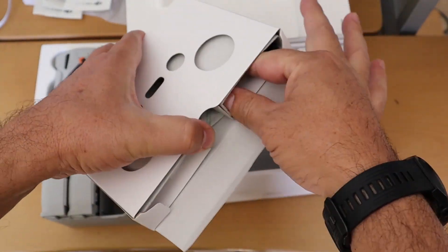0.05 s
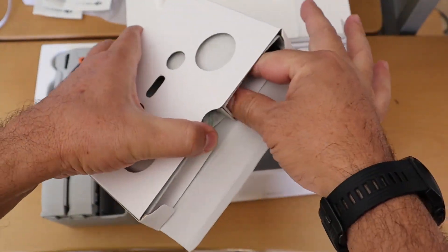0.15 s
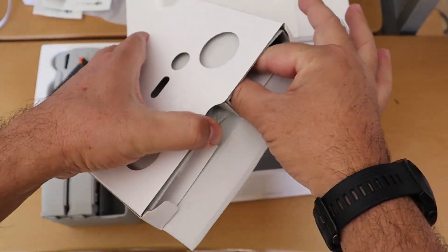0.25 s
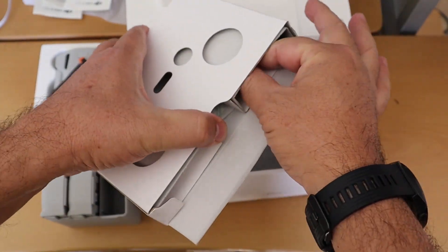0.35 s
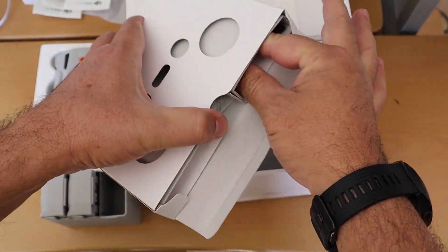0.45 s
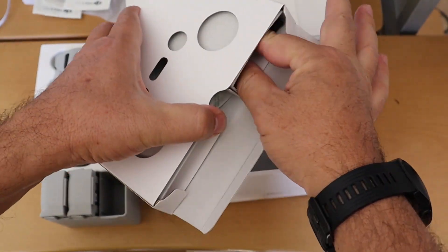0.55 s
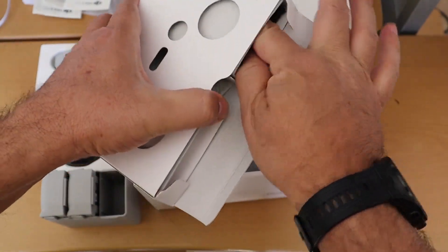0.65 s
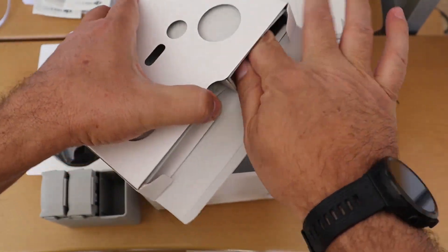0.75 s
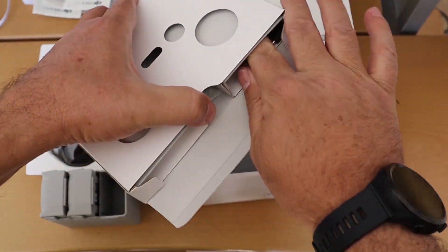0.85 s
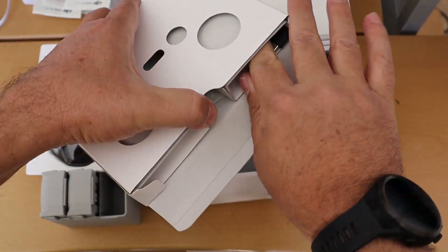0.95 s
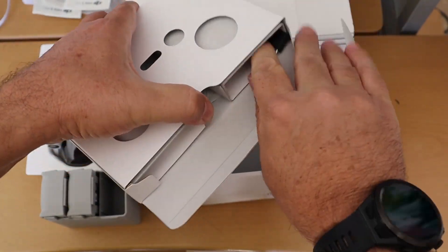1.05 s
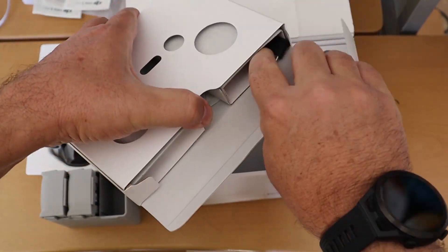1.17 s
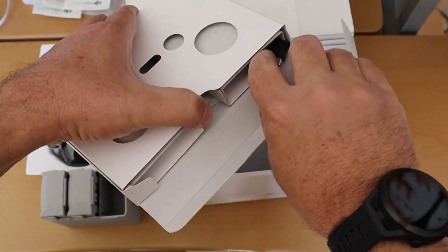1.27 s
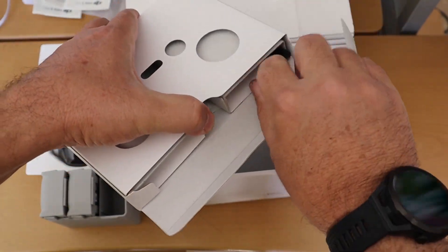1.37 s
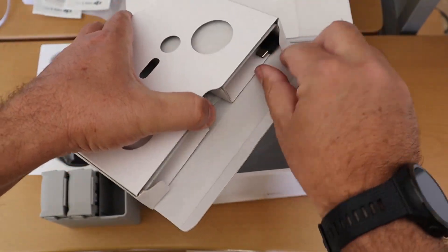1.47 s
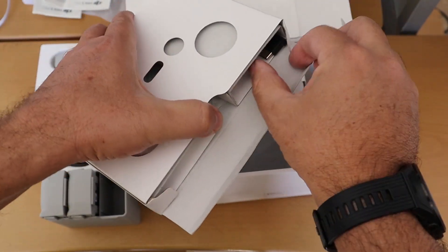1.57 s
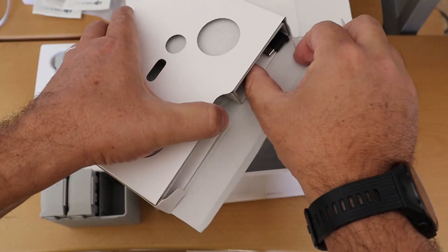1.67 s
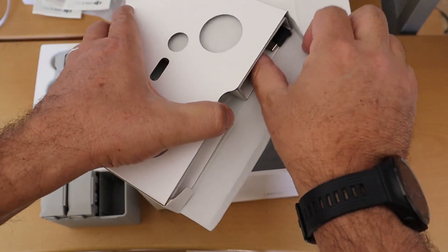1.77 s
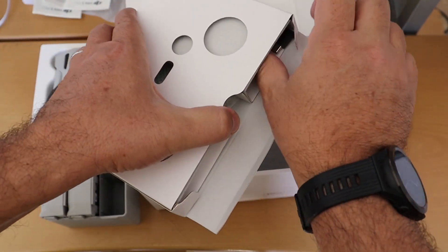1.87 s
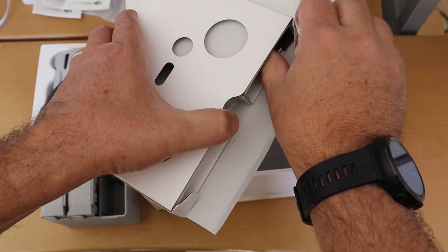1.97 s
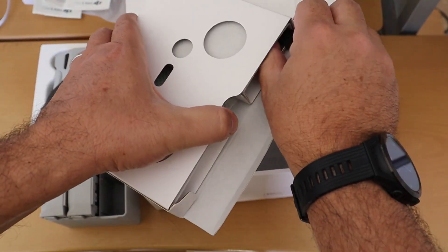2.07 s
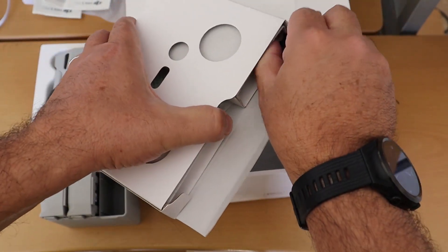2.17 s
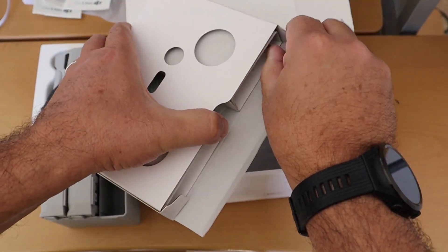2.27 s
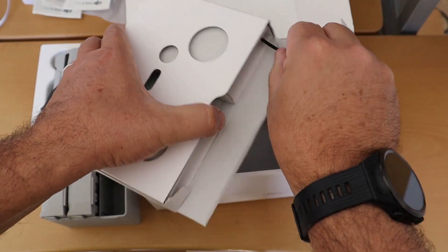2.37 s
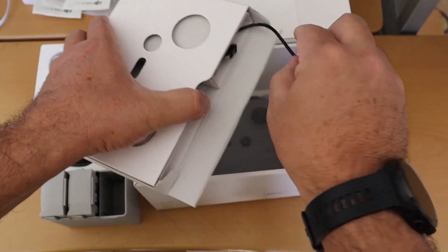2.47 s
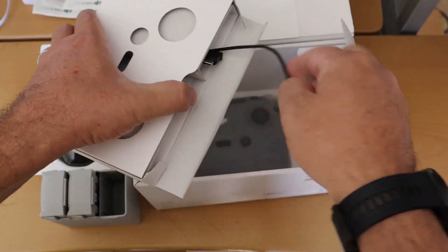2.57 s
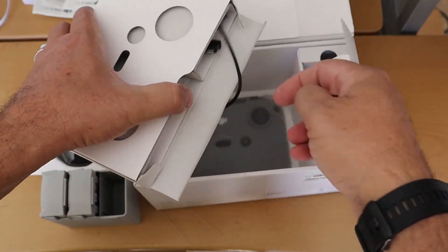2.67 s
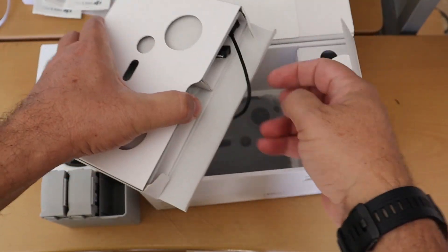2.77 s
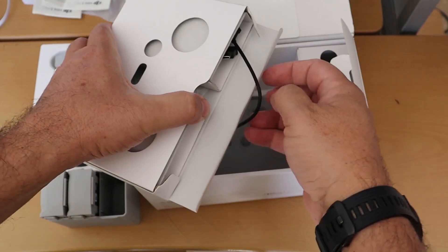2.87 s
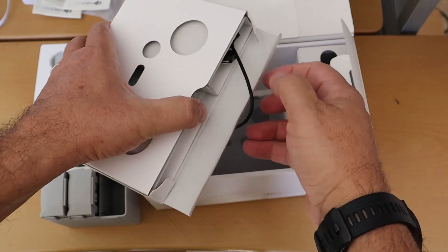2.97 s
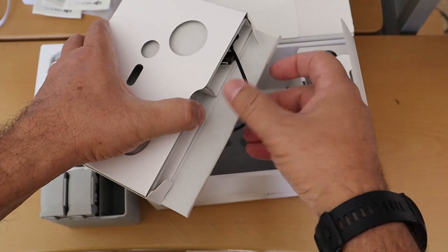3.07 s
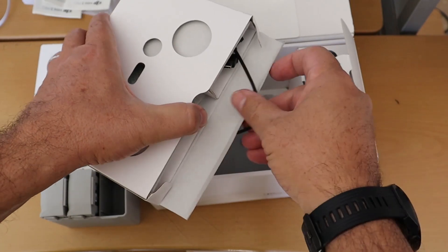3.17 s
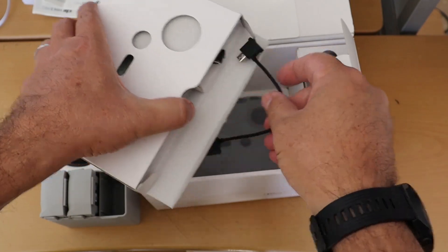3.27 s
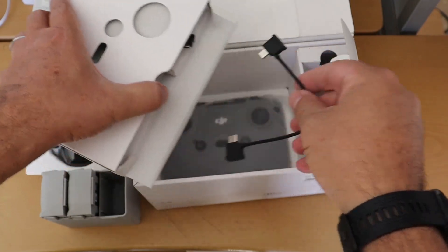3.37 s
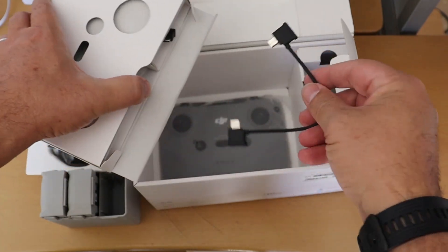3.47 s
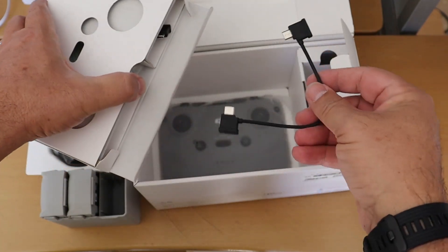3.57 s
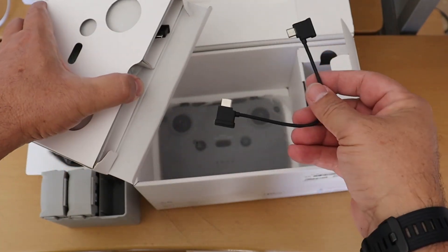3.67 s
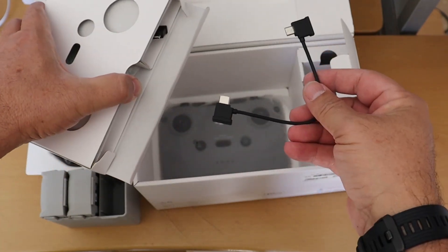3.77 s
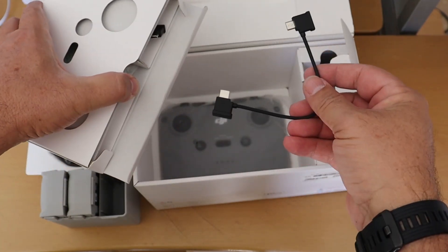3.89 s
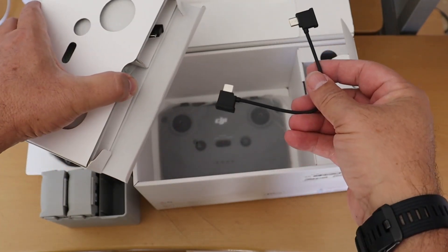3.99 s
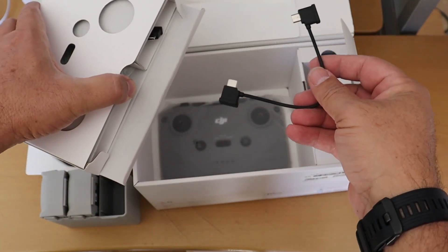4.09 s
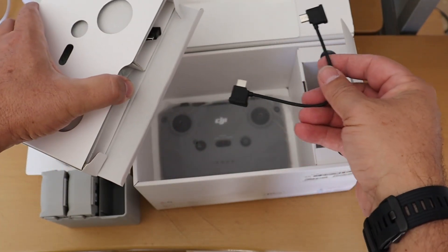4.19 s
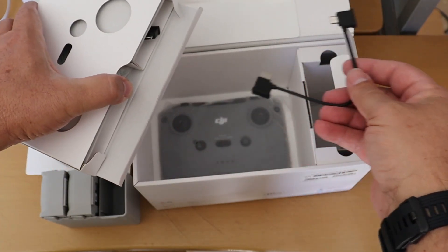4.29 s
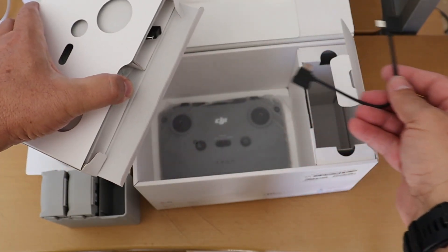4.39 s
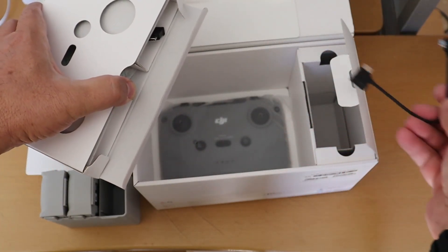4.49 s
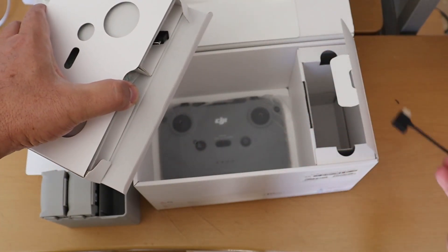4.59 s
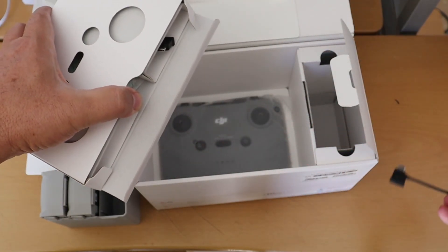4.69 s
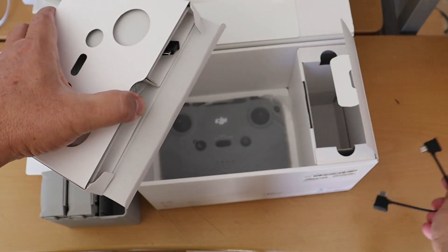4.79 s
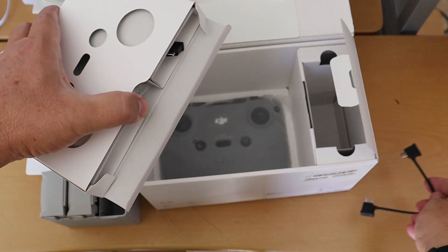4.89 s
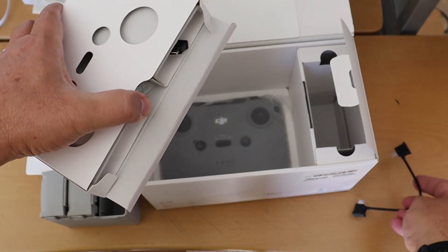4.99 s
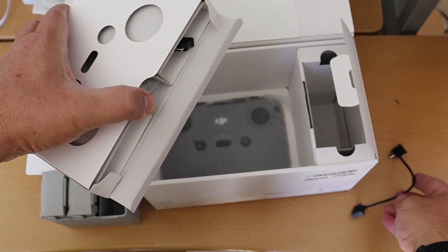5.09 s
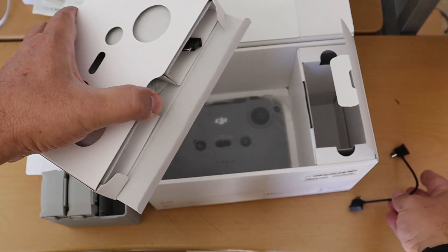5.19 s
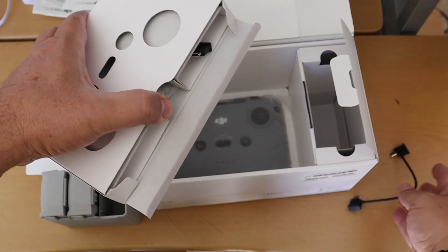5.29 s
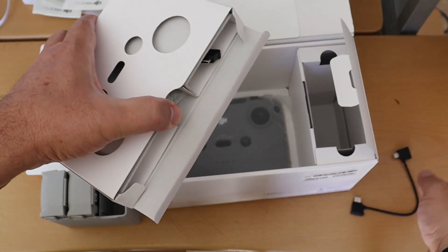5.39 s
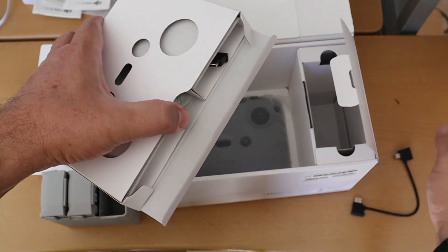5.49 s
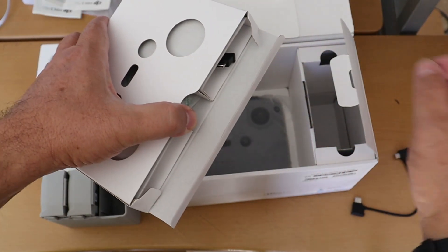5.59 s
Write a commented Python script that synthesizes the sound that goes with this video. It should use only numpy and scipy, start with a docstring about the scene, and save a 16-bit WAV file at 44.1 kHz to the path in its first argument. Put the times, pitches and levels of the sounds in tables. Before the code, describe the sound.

Dry clacks and papery scrapes on a hollow cardboard piece, a pause, then small plugs tapping lightly on wood in a bare room.

```python
"""Plastic plugs and card flaps knock on a hollow, folded insert as hands work a short cable out of it, up close.
Each knock is a noisy crack that rings the insert's modes; small creaks and soft low throbs come from the card.
Rubs on the card, and brief crumbles leading into a knock, are swells of dense tiny slips.
After a pause the plugs land on a wooden table and ring its top; bright tails near 4 kHz linger after some contacts.
A bare room answers with early scatter and a diffuse tail, over a bed of quiet coloured noise."""
import sys
import numpy as np
from scipy import signal
from scipy.fft import rfft, irfft, next_fast_len
from scipy.io import wavfile
from scipy.ndimage import uniform_filter1d

SR = 44100
rng = np.random.default_rng(int(sys.argv[2]) if len(sys.argv) > 2 else 0)


def digitize_waveform(pressure):
    """Quantize a signal to 16-bit integers and store it at the path in sys.argv[1].

    Rows of a 2-D input are taken as channels; values are limited to [-1, 1].
    """
    field = np.atleast_2d(pressure).T
    bounded = np.clip(field, -1, 1)
    quanta = np.round(bounded * 32767).astype(np.int16)
    wavfile.write(sys.argv[1], SR, quanta)


N = 248724
TIME = np.arange(N) / SR

# Snaps and knocks on the insert. Each row: start in seconds, level in dB, treble and bass slopes in dB per
# octave, the struck spot's ring in Hz, its level in dB, its T60 in seconds, rebound in dB against the first hit.
KNOCKS = [ (.0852, -18.5, -0.5, 7.5, 890, 4.5, 0.036, 1), (.093, -17, -19, 2.5, 993, -3.5, 0.052, -16),
          (.107, -23.5, 11, 1, 1070, -9, 0.017, -18), (.263, -27.5, -10, 10, 930, 0, 0.017, -2),
          (.296, -23.5, 2, 1, 597, 7, 0.015, -3), (0.3508, -24.5, -5, 3, 965, 8, 0.023, 0),
          (0.404, -22.5, -0.5, 8.5, 400, 0, 0.037, 6.5), (0.42, -32, -1, 4, 800, -8, 0.016, -16),
          (.4655, -11.5, 4.5, 6, 1990, 3.5, 0.017, -7), (.489, -29, -7, 4, 1030, 2, 0.018, -21),
          (.508, -19.5, -11, 1, 925, 9.5, 0.018, -9), (0.701, -27, -3, 0, 1290, 4, .015, -1),
          (1.0873, -21, -2, 0, 3430, -8, 0.016, 1), (1.2934, -23.5, 1, 9, 1050, 17, 0.019, -17),
          (1.4364, -11, 1.5, 0.5, 1795, 17, 0.011, -8), (1.447, -16.5, -5, -6, 1840, 3.5, 0.033, -13.5),
          (1.4765, -19, 2.5, 11, 402, -2.5, 0.022, -18), (1.4902, -15, 8.5, 0, 2400, -1, 0.024, -19),
          (1.517, -20, 5, 1, 5660, 5, 0.0094, -21), (1.5414, -1.5, 0, 2, 2020, 7, 0.022, -22.5),
          (1.543, -6.5, -13.5, 3, 920, 9.5, 0.019, -28), (1.569, -8.5, 0.5, 3.5, 920, 0, 0.044, -20),
          (1.587, -29, -10, 0, 860, 14, 0.026, -7), (1.624, -20.5, 0, 29, 1240, 2, .02, 1),
          (1.7204, -23.5, -2.5, -3, 1200, 4.5, 0.017, 6.5), (1.743, -22, -3, 1, 1500, -8, 0.018, -2),
          (1.8992, -10.5, 9.5, 0, 4700, -10, 0.013, 1.5), (1.9049, -3, 3.5, -6, 1480, 8, 0.015, -17),
          (2.2073, -24, -5, 5, 1300, -2, 0.023, -27.5), (2.231, -26, -2.5, -10, 1690, -4, 0.019, -15.5),
          (2.2526, -12, -8, -4.5, 1440, 6, 0.031, -5), (2.4415, -1, -2, -8.5, 3110, 6.5, 0.014, -30),
          (2.452, -20.5, -2, -11, 3120, 5, 0.03, -28), (2.509, -21.5, -7, -15, 1760, -12, 0.012, 8),
          (2.5256, -6.5, 3.5, -0.5, 1360, 1.5, 0.011, -9.5),
          (2.5302, -5.5, 3, -1.5, 3540, 7.5, 0.0067, -13.5), (2.5846, -14, -3, -0.5, 1420, 3, 0.014, -16),
          (2.6035, -17, 11, 7, 3520, 6, 0.013, -8), (2.64, -23, -10, 10, 913, 17, 0.015, -14),
          (2.673, -13, -3, 6.5, 1796, 3, 0.027, -10), (2.7068, -18, -9, 9, 1170, 7, 0.035, -11),
          (2.7651, -3.5, -3, 4, 1380, 9.5, 0.011, -25), (2.769, -6, 3, 4.5, 1070, -3.5, 0.023, -14.5),
          (2.779, -3, 0, 1, 1154, 3.5, 0.019, -13.5), (2.7819, -8, -18, 6.5, 1070, -15.5, 0.013, -2),
          (2.7919, -16.5, 6, -2, 820, 5, 0.017, -3), (2.9488, -17.5, -16.5, 1.5, 1240, 3.5, 0.016, -37.5),
          (2.9796, -21, 0, 8.5, 1070, 7.5, 0.019, -30.5), (3.004, -41, -3, 0, 1390, 19, 0.014, -24.5),
          (3.115, -29.5, -29, 3, 1056, 2, 0.023, -27), (3.2343, -20, -5, 4.5, 1200, 9, 0.016, -8),
          (3.29, -19.5, -5, -3.5, 1230, 9, 0.018, -8.5), (3.3007, -1, -1.5, -0.5, 3070, -1.5, 0.011, -25),
          (3.3042, -2.5, -8, 0, 1210, 0, .02, -20), (3.3279, -7, -5.5, -2, 1717, -2.5, 0.09, 0.5),
          (3.3837, -9, -6, -11, 1610, 8.5, 0.0082, -11), (3.3884, -17, 4, -6, 1500, 11, 0.012, -20),
          (3.3916, -15, -3, 3, 1304, 2, 0.053, -14)]
# Resonances of the hollow insert. Each row: frequency in Hz, level in dB, T60 in seconds.
CARD_MODES = [(351, -23.5, 0.064), (456, -16, 0.028), (584, -13.5, 0.019), (887, -11.5, 0.036),
              (1174, -3, 0.017), (1260, -3.5, 0.014), (1859, -12, 0.019), (2098, -16.5, 0.048),
              (3207, -14.5, 0.0088), (3860, -6.5, 0.0052), (6840, -20.5, 0.0094)]
# Spectrum of the crack of a contact on card. Each row: frequency in Hz, level in dB.
CARD_CRACK = [(150, -21), (500, -1.5), (1500, 3), (3500, 4.5), (5000, -5.5), (7200, -6), (9500, -20.5),
              (16000, -60)]
# Tiny top-treble clicks at the start of some contacts. Each row: start in seconds, level in dB before CLICK_DB.
CLICKS = [(0.1059, -30), (0.467, -14), (1.516, -37), (1.5408, -40), (1.567, -31), (1.8988, -17),
          (1.9042, -24), (2.2299, -37), (2.4409, -28), (2.5249, -24), (2.5296, -25), (2.7686, -21),
          (2.778, -18), (2.7916, -29), (3.3002, -16), (3.3906, -37)]
# Rubs on card, and brief crumbles leading into a knock. Each row: loudest moment in seconds, length in seconds,
# level in dB, hollow body against the hiss in dB, brightness in dB per octave, sizzle of the card's edge in dB.
STROKES = [ (.01, 0.065, -42, 3.5, -3.5, -6), (0.092, 0.013, -37.5, -5, -5, 4),
           (.287, 0.056, -38, -2, -3, -2.5), (0.407, 0.044, -37.5, -2, -2.5, -2),
           (0.533, 0.079, -40, -0.5, -1.5, -2), (0.669, 0.047, -44, 5.5, -2, -1.5),
           (0.736, 0.027, -33.5, -4, -.5, -1.5), (0.807, 0.051, -30, -2.5, 1, -3.5),
           (0.868, 0.022, -39, -9, -0.5, -1), (0.926, 0.054, -37, -8, 1, -3),
           (1.056, .03, -41.5, -20, 0.5, -1.5), (1.109, 0.058, -36.5, -5, -1.5, -1),
           (1.252, 0.032, -39.5, -7, 3.5, -2), (1.349, 0.09, -41.5, 0, 0.5, -12),
           (1.435, 0.0018, -35, 7, 10, 3), (1.445, 0.013, -32, 11, -1.5, 1),
           (1.481, 0.018, -31.5, -21, 3, -5), (1.614, 0.017, -33, 5, 0.5, 2.5),
           (1.744, 0.097, -44, 2, -4, -5), (1.883, 0.071, -41, 8.5, -3.5, -1),
           (2.089, 0.022, -35.5, 3, 0.5, -1), (2.147, 0.17, -46.5, -30, 0, -5),
           (2.255, .005, -32, -5.5, -4, -6), (2.29, 0.051, -31.5, -2.5, -0.5, -7.5),
           (2.436, 0.052, -34.5, -5, 1, -5), (2.511, 0.043, -46, 11.5, 4.5, -4.5),
           (2.567, 0.064, -34, -7.5, -1.5, -6.5), (2.609, 0.0071, -31, 8.5, 9.5, 3.5),
           (2.749, 0.03, -30, -0.5, -1, 3.5), (2.925, 0.02, -34.5, -1, -0.5, -0.5),
           (3.203, 0.081, -38.5, -10, 1.5, -7), (3.291, 0.035, -37, 0, 4, -4.5),
           (3.325, 0.0039, -24.5, -2.5, 3.5, -3), (3.371, .035, -31.5, -10, 0.5, -8.5)]
# Spectrum of the surface hiss before a stroke's brightness tilts it. Each row: frequency in Hz, level in dB.
SKIN_HISS = [(150, -9.5), (400, -11.5), (800, -20.5), (1500, -1.5), (2400, -1.5), (3600, -1), (5200, -6.5),
             (7000, -1), (8800, -30), (12000, -19.5), (16000, -27.5)]
# Spectrum of the cut edge's sizzle. Each row: frequency in Hz, level in dB.
EDGE_HISS = [(150, -69), (4000, -6), (7500, 1), (10000, -8), (13000, -13), (16000, -19.5)]
# Spectrum of the coarser catches at the surface. Each row: frequency in Hz, level in dB.
CRACKLE = [(150, -30), (800, -8), (2000, 0), (4000, 0), (6500, -5), (10000, -20), (16000, -35)]
# Bright, grainy bands of noise around 4 kHz that linger after some contacts. Each row: start in seconds, T60 in
# seconds, level in dB, centre in Hz, width in octaves of the filter that is run twice.
BRIGHT_TAILS = [(1.91, 0.45, -31.5, 4600, 0.52), (2.55, 0.34, -29.5, 4440, 0.93),
                (2.916, 0.071, -23, 3630, .7), (5.4962, 0.014, -5, 4200, 1.3),
                (5.503, 0.31, -28, 3850, 0.93), (5.592, 0.24, -40, 3680, 0.94)]
# Plugs landing on the table. Each row: start in seconds, level in dB, treble and bass slopes in dB per octave,
# the struck spot's ring in Hz, its level in dB, its T60 in seconds, rebound in dB against the first hit.
DROPS = [(5.1166, -14.5, -6.5, 4.5, 1670, 8.5, 0.016, -24),
         (5.1192, -11.5, -12.5, 1.5, 1210, 10.5, .018, -1.5), (5.1956, -19, -19, -1.5, 1410, 6, 0.011, -8),
         (5.2022, -18.5, -8, -1, 573, 6, 0.037, -14), (5.2168, -24, -3, 1, 607, 9.5, 0.03, 1.5),
         (5.4905, -26.5, -0.5, -2, 3850, 5, 0.0043, -7.5),
         (5.4972, -16.5, -3, -2.5, 3560, 10, 0.0041, -1.5), (5.5495, -23, -4, -3, 1260, -2, 0.0092, -13)]
# The plug's short clack and the table top's longer woody ring. Each row: frequency in Hz, level in dB, T60 in seconds.
TABLE_MODES = [(223, -24, .04), (399, -16, 0.022), (512, -22.5, .14), (600, -10, 0.014), (704, -24, 0.15),
               (900, -12.5, 0.023), (1070, -8, 0.0079), (1155, -22, 0.16), (1440, -9, 0.0076),
               (1700, -23, 0.076), (2065, -18.5, 0.19), (3000, -6, .009), (4100, -9, .006),
               (6300, -22, .09)]
# Spectrum of the crack of a contact on the table. Each row: frequency in Hz, level in dB.
TABLE_CRACK = [(150, -21), (500, -1.5), (1300, -3.5), (2700, 4.5), (4500, -0.5), (7000, 0), (10000, -18),
               (16000, -48)]
# The broad face of the insert flexing. Each row: start in seconds, level in dB.
FLEXES = [(0.261, -50), (1.474, -46), (1.61, -55), (1.851, -40), (2.558, -35), (2.605, -36), (5.045, -47.5)]
# Decay of the room's tail. Each row: frequency in Hz, T60 in seconds.
ROOM_T60 = [(150, .4), (400, .65), (800, .85), (1800, .82), (2800, .7), (5000, .64), (7500, .55),
            (15000, .35)]
# Spectrum of the room's tail at its start. Each row: frequency in Hz, level in dB.
ROOM_COLOUR = [(100, -8), (300, -4), (600, 0), (1200, 0), (2000, -.5), (2700, -3.5), (4400, .5),
               (6500, -4.5), (9000, -10), (16000, -16)]
# Spectrum of the quiet room. Each row: frequency in Hz, relative density in dB per Hz.
AMBIENCE = [(15, -38), (25, -8), (69, 0), (104, 0), (221, -6), (289, -6), (410, -9), (482, -14), (567, -13),
            (1270, -16), (1380, -17), (4380, -19), (7700, -24), (11800, -25), (15500, -28)]

CONTACT_S = 0.000067  # time constant of a contact building up
REBOUND_S = 0.0038  # delay until a plug tips over and touches again
SETTLE_S, SETTLE_DB = 0.011, -17.5  # delay and relative level of the last, light touch
SPOT_AWAY_DB = -8  # loss of the struck spot's ring away from the microphone
TICK_DB, TICK_SPREAD_DB = -31, 3  # middle level of the creaks, and spread either side
TICK_BRIGHTNESS, TICK_HZ, TICK_T60 = 2.6, 1080, 0.015  # dB per octave, centre of the pitches, seconds
TICKS_END_S = 2.9
CLICK_DB, CLICK_T60, CLICK_HZ = -1, 0.0044, 9000  # trim for all clicks, seconds, lower edge
RISE_SHARE, STROKE_FALL_DB = 0.49, 4.5  # part of a stroke spent rising; drop at either end
GRIP_DETUNE = 0.08  # typical share by which each stroke shifts the insert's modes
CRACKLE_DB = -8  # the catches' level against the surface hiss
WANDER_DB, WANDER_S, WANDER_HZ = 2.6, 0.025, 700  # depth, duration and width of a patch of colour
BRIGHT_TAIL_RISE_S = 0.003  # time constant of the tail's onset
FLEX_HZ, FLEX_RISE_S = 99, 0.025
ROOM_DB, ROOM_BUILD_S = -8, 0.0043  # tail level, and time constant of its build-up
AMBIENCE_DB = -53
CUTOFF_HZ = 16000


def knocks(creaks, into_room):
    """Plugs and flaps strike the hollow insert, and the strained card's creaks ring the same body."""
    events = contacts(KNOCKS, room_db=-6, weak_wetter=0.053) + creaks
    return blows(events, CARD_MODES, CARD_CRACK, crack_db=2.0, crack_t60=0.014, spread_db=1.5,
                 detune_share=0.031, low_hz=333, high_hz=CUTOFF_HZ, into_room=into_room, size=3072)


def contacts(rows, room_db, weak_wetter):
    """Every blow hits, rebounds and settles; a weaker contact sends relatively more to the room (dB per dB)."""
    events = []
    for s, level_db, *colour, rebound_db in rows:
        touches = ((0, level_db), (REBOUND_S, level_db + rebound_db), (SETTLE_S, level_db + SETTLE_DB))
        for delay, db in touches:
            events.append((s + delay, db, *colour, room_db - weak_wetter * db))
    return events


def blows(events, modes, crack, crack_db, crack_t60, spread_db, detune_share, low_hz, high_hz, into_room, size):
    """Each contact cracks and rings the body's modes and the struck spot; every call radiates in a new direction."""
    out, t = np.zeros(N), TIME[:size]
    click = signal.unit_impulse(len(t))
    # the surface gives way in a few milliseconds of tiny steps
    crumble = (1 - np.exp(-t / CONTACT_S)) * fade(t, crack_t60)
    for s, level_db, treble, bass, spot_hz, spot_db, spot_t60, room_db in events:
        # the struck spot faces the microphone, so less of its ring reaches the room
        sound = from_db(spot_db + SPOT_AWAY_DB * into_room) * ring(click, spot_hz, spot_t60)
        for k, (hz, mode_db, t60) in enumerate(modes):
            detune = 1 + rng.normal(0, detune_share)  # grip and place of contact shift the modes
            gain = from_db(mode_db + tilted(hz, treble, bass) + rng.normal(0, spread_db))
            sound += (-1) ** k * gain * ring(click, hz * detune, t60)
        colour = [(hz, db + tilted(hz, treble, bass)) for hz, db in crack]
        sound += from_db(crack_db) * coloured(rng.standard_normal(len(t)), colour) * crumble
        # the level stands for the blow's energy packed into one millisecond
        sound /= np.sqrt(np.sum(sound ** 2) / (0.001 * SR))
        add(out, s, from_db(level_db + room_db * into_room) * sound)
    # a small panel radiates little bass, and a blunt contact little treble
    band = signal.butter(2, [low_hz, min(high_hz, CUTOFF_HZ)], "band", fs=SR, output="sos")
    return signal.sosfilt(band, out + 1e-18)


def tilted(hz, treble, bass):
    """A contact's colour in dB: treble slope rises above 1500 Hz, bass slope rises below it, level under 300 Hz."""
    octaves = np.log2(max(hz, 300) / 1500)
    return treble * octaves if octaves > 0 else -bass * octaves


def ticks(count):
    """The strained card gives small creaks at scattered moments and places."""
    events = []
    for k, (when, size, place) in enumerate(rng.random((count, 3))):
        s = TICKS_END_S * (k + when) / count
        level_db = TICK_DB + TICK_SPREAD_DB * (2 * size - 1)
        spot_hz = TICK_HZ * 2 ** (place - 0.5)  # up to half an octave either way
        events.append((s, level_db, TICK_BRIGHTNESS, 0, spot_hz, 0, TICK_T60, 0))
    return events


def plug_clicks():
    """The start of a hard contact is a tiny noise burst in the top treble."""
    out, t = np.zeros(N), TIME[:256]
    for s, level_db in CLICKS:
        burst = rng.standard_normal(len(t)) * fade(t, CLICK_T60)
        add(out, s, from_db(level_db + CLICK_DB) * burst)
    return signal.sosfilt(signal.butter(2, CLICK_HZ, "high", fs=SR, output="sos"), out + 1e-18)


def rubbing():
    """Rubs and crumbles swell and fade: fine slips hiss, coarser catches crackle in the hollow insert."""
    out = np.zeros(N)
    slips = wandering(friction(slips_per_s=3000, size_db=2.6, smooth=0.4, judder_db=2.0, judder_s=0.002))
    catches = friction(slips_per_s=650, size_db=2.5, smooth=0.3, judder_db=1.8, judder_s=0.005)
    snags = friction(slips_per_s=2600, size_db=2.8, smooth=0.4, judder_db=2.3, judder_s=0.003)
    edge = coloured(wandering(snags), EDGE_HISS)
    crackle = from_db(CRACKLE_DB) * coloured(catches, CRACKLE)
    for peak, length, level_db, hollow_db, brightness, edge_db in STROKES:
        span = slice(max(round((peak - 2 * length) * SR), 0), round((peak + 3 * length) * SR))
        detunes = 1 + rng.normal(0, GRIP_DETUNE, len(CARD_MODES))
        hollow = 0
        for k, (hz, db, t60) in enumerate(CARD_MODES):
            hollow = hollow + (-1) ** k * from_db(db) * ring(catches[span], hz * detunes[k], t60)
        sound = coloured(slips[span], SKIN_HISS, brightness) + crackle[span]
        sound += from_db(hollow_db) * rms_one(hollow) + from_db(edge_db) * edge[span]
        out[span] += from_db(level_db) * swell(TIME[span] - peak, length) * sound
    return out


def friction(slips_per_s, size_db, smooth, judder_db, judder_s):
    """A grainy noise: dense slips of uneven size over a smooth hiss, under a juddering level."""
    sizes = from_db(size_db * np.minimum(rng.exponential(1, N), 4)) * rng.choice([-1, 1], N)
    slips = sizes * (rng.random(N) < slips_per_s / SR)
    memory = np.exp(-1 / (judder_s * SR))
    judder = rms_one(signal.lfilter([1], [1, -memory], rng.standard_normal(N)))
    return rms_one(from_db(judder_db * judder) * (rms_one(slips) + smooth * rng.standard_normal(N)))


def wandering(x, size=256):
    """As the point of contact slides, ever new bands of the hiss stand out; rms 1."""
    hz, s, bands = signal.stft(x, SR, nperseg=size)
    patches = uniform_filter1d(rng.standard_normal(bands.shape), round(WANDER_HZ / hz[1]), axis=0)
    patches = rms_one(uniform_filter1d(patches, round(WANDER_S / s[1]), axis=1))
    moved = signal.istft(bands * from_db(WANDER_DB * patches), SR, nperseg=size)[1]
    return rms_one(moved[:len(x)])


def swell(t, length):
    """Gain of a rub or crumble around its loudest moment: a rounded top with soft skirts."""
    away = np.abs(t) / (length * np.where(t < 0, RISE_SHARE, 1 - RISE_SHARE))
    return from_db(-STROKE_FALL_DB * np.minimum(away, 4) ** 1.7)


def bright_tails():
    """Some hard contacts are followed by a bright, grainy band of noise that starts at once and sinks unevenly."""
    out, t = np.zeros(N), TIME[:SR // 2]
    grains = friction(slips_per_s=1800, size_db=2.8, smooth=0.4, judder_db=2.2, judder_s=0.003)
    for k, (s, t60, level_db, hz, octaves) in enumerate(BRIGHT_TAILS):
        edges = hz * 2 ** (min(octaves, 2) * np.array([-0.5, 0.5]))
        band = signal.butter(1, edges, "band", fs=SR, output="sos")
        piece = grains[k * len(t):(k + 1) * len(t)]
        tail = rms_one(signal.sosfilt(band, signal.sosfilt(band, piece)))
        envelope = (1 - np.exp(-t / BRIGHT_TAIL_RISE_S)) * fade(t, t60)
        add(out, s, from_db(level_db) * tail * envelope)
    return out


def drops(into_room):
    """Plugs land on the table, whose top rings on at nearly the same pitches wherever they land."""
    events = contacts(DROPS, room_db=1.0, weak_wetter=0.04)
    return blows(events, TABLE_MODES, TABLE_CRACK, crack_db=0.0, crack_t60=0.02, spread_db=1.5,
                 detune_share=0.0091, low_hz=197, high_hz=9000, into_room=into_room, size=12000)


def flexing():
    """The insert's broad face bends and pushes out a soft, low throb."""
    out, t = np.zeros(N), TIME[:SR // 4]
    envelope = (t / FLEX_RISE_S) * np.exp(1 - t / FLEX_RISE_S)
    throb = envelope * np.sin(2 * np.pi * FLEX_HZ * t)
    for s, level_db in FLEXES:
        add(out, s, from_db(level_db) * throb)
    return out


def room(x, early_db, early_t60):
    """Quick scatter from nearby surfaces, then a diffuse tail that dies band by band."""
    t, tail = TIME[:SR], np.zeros(SR)
    edges = np.geomspace(80, 17000, 12)
    # neighbouring bands take turns on two separate noises
    noises = [coloured(rng.standard_normal(SR), ROOM_COLOUR) for _ in range(2)]
    for k, (low, high) in enumerate(zip(edges, edges[1:])):
        band_pass = signal.butter(2, [low, high], "band", fs=SR, output="sos")
        band = signal.sosfilt(band_pass, noises[k % 2])
        tail += band * fade(t, at_hz(ROOM_T60, np.sqrt(low * high)))
    tail *= 1 - np.exp(-t / ROOM_BUILD_S)
    early = rng.standard_normal(SR) * t * fade(t, early_t60)
    response = from_db(ROOM_DB) * rms_one(tail) + from_db(early_db) * rms_one(early)
    return signal.fftconvolve(x, response / np.sqrt(SR))[:N]


def quiet_room():
    """The background is steady noise shaped to the room's dull colour."""
    return from_db(AMBIENCE_DB) * coloured(rng.standard_normal(N), AMBIENCE)


def from_db(db):
    """Decibels to gain."""
    return 10 ** (np.asarray(db) / 20)


def rms_one(x):
    """Scale to unit power."""
    return x / np.sqrt(np.mean(x ** 2) + 1e-20)


def at_hz(points, hz):
    """Read a table on a log-frequency axis."""
    known_hz, values = np.transpose(points)
    return np.interp(np.log(np.maximum(hz, 1)), np.log(known_hz), values)


def coloured(x, spectrum, tilt_db=0):
    """Give a noise a spectrum, tilted in dB per octave above 300 Hz; rms 1."""
    size = next_fast_len(len(x))
    hz = np.maximum(np.arange(size // 2 + 1) * SR / size, 20)
    gain = from_db(at_hz(spectrum, hz) + tilt_db * np.log2(np.maximum(hz, 300)))
    return rms_one(irfft(rfft(x, size) * gain, size)[:len(x)])


def fade(t, t60):
    """Free decay, 60 dB down after t60 seconds."""
    return np.exp(-np.log(1000) * t / max(t60, 1e-4))


def ring(force, hz, t60):
    """A damped resonator: a unit click sets a decaying sine of starting height 1 ringing."""
    r, w = fade(1 / SR, t60), 2 * np.pi * hz / SR
    return signal.lfilter([0, np.sin(w)], [1, -2 * r * np.cos(w), r * r], force + 1e-18)


def add(track, s, sound):
    """Mix a sound in at a time in seconds."""
    start = max(round(s * SR), 0)
    track[start:start + len(sound)] += sound[:max(N - start, 0)]


def scene():
    """Knocks, rubs and drops in a bare room, over its quiet background."""
    creaks = ticks(count=22)
    grainy = rubbing() + bright_tails()
    direct = knocks(creaks, into_room=False) + plug_clicks() + grainy + drops(into_room=False) + flexing()
    echo = np.zeros(N)
    # a blow radiates differently in each direction, and each direction has its own path round the room
    for _ in range(3):
        send = from_db(-7.5) * knocks(creaks, into_room=True)
        send += from_db(-6.5) * grainy
        send += from_db(-6.0) * drops(into_room=True)
        echo += room(send, early_db=-8.0, early_t60=0.063)
    return (direct + echo + quiet_room())[None]


def record(dry):
    """Soft saturation rounds the tallest peaks and a steep low-pass cuts the top."""
    rounded = 1.1 * np.tanh(dry / 1.1)
    return signal.sosfilt(signal.ellip(12, 0.1, 90, CUTOFF_HZ, fs=SR, output="sos"), rounded)


dry = scene()
out = record(dry)
digitize_waveform(out)
```